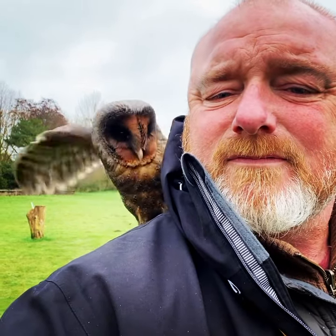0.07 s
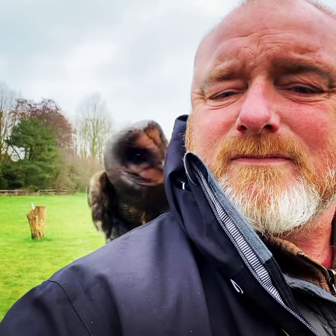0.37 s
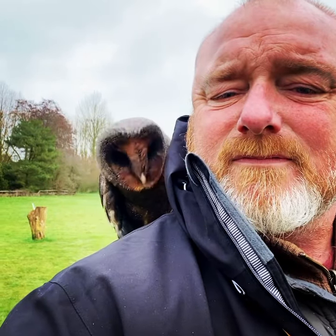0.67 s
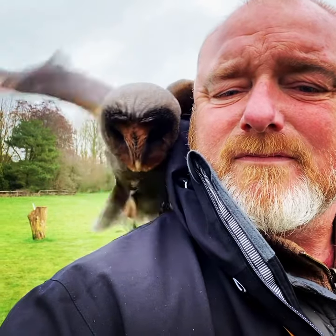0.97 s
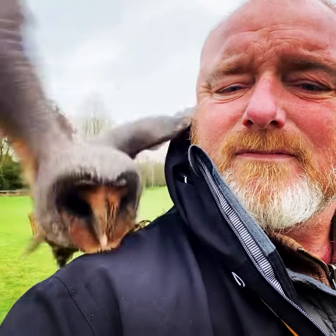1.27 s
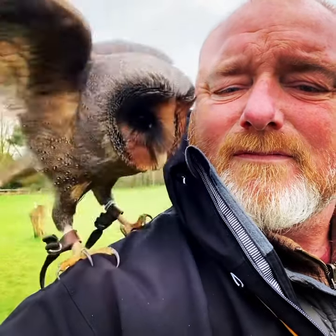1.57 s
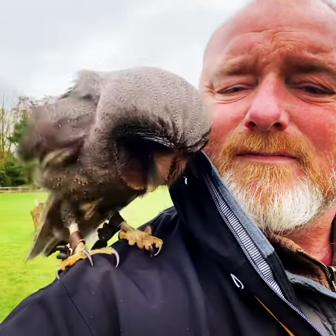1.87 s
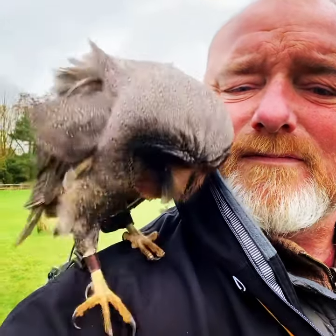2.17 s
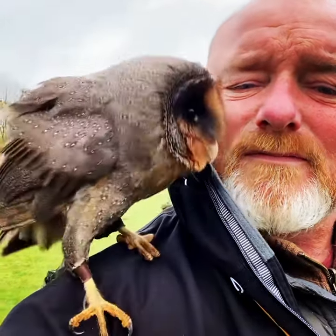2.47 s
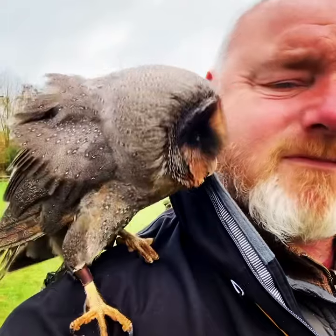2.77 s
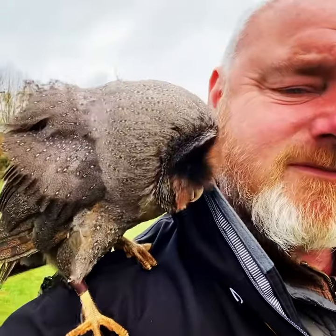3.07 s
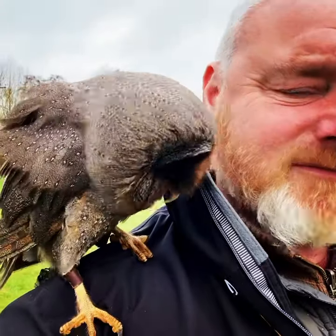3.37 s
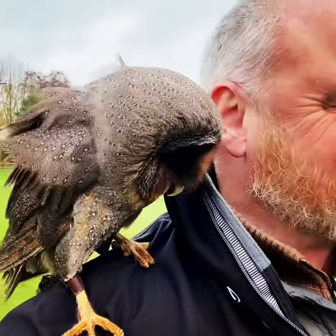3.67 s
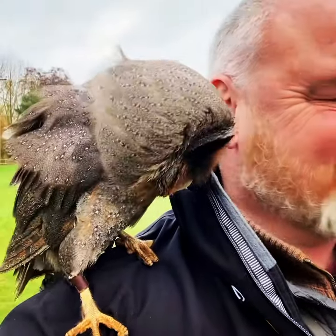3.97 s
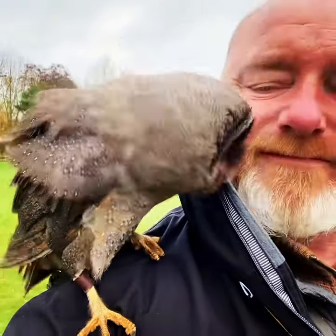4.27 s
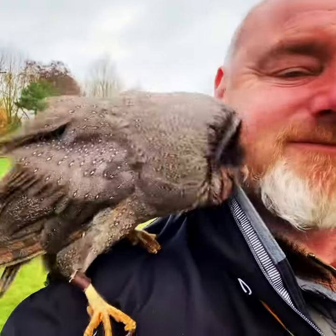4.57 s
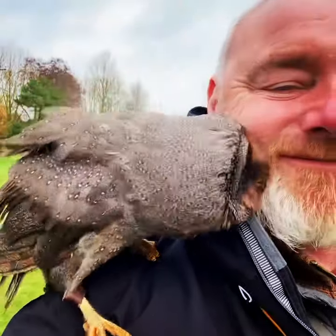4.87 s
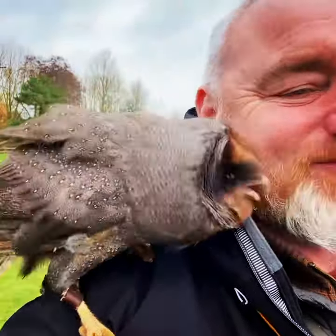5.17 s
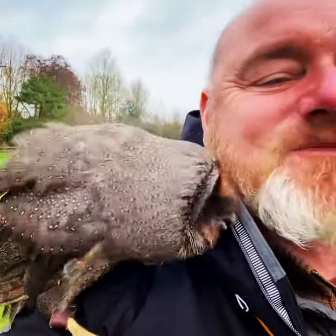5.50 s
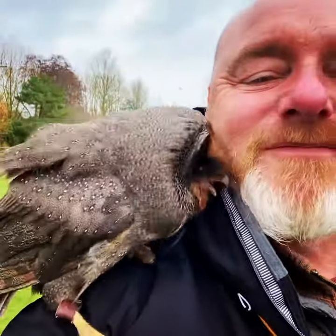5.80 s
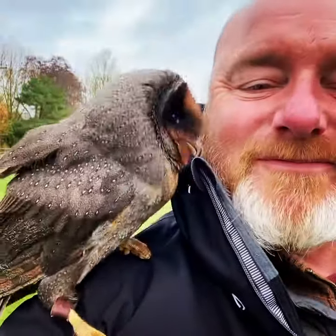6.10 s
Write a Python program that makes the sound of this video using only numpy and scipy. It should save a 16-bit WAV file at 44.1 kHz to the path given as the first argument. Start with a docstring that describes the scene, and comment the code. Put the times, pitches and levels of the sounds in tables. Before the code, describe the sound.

A soft wash of open-field air and a light breeze run throughout, with a distant engine droning low and fading out by about 2.5 seconds. From around 1 second, very close to the microphone, an owl scrambles onto a padded jacket: quick taps and scuffs of claws on cloth, rustling feathers and wing gusts, with a strong low thump on the microphone at 1.5 seconds. The movement settles just after 2 seconds. At 3 seconds the owl begins one harsh, hissing screech with a thin whistling edge; it grows louder and brighter, then stops abruptly at 3.8 seconds. A small scuff comes at 4.3 seconds and a sharp, dry beak snap at 4.5. A very faint, thin bird whistle sounds far away from about 5.6 to 6.1 seconds. Just after 6 seconds the owl shuffles briefly on the jacket with soft puffs of air.

```python
"""In a quiet field a far engine drones and fades under the outdoor wash. An owl scrambles onto a jacketed
shoulder close to a handheld camera: its feet scuff the cloth by friction, its wings push air at the
microphone and its feathers settle. It then gives one long screech, a turbulent jet filtered by the
resonances of throat and beak, and snaps its beak shut. A faint bird whistles far away, and last the owl
shuffles briefly on the jacket."""
import sys
import numpy as np
from scipy import signal
from scipy.fft import rfft, irfft, next_fast_len
from scipy.io import wavfile
from scipy.ndimage import uniform_filter1d, map_coordinates

SR = 44100
rng = np.random.default_rng(int(sys.argv[2]) if len(sys.argv) > 2 else 0)


def put_to_file(sound):
    """Save the sound as 16-bit audio at rate SR, in the file named by the first command-line argument."""
    columns = np.atleast_2d(sound).T  # one column per channel
    safe = np.clip(columns, -1, 1)
    whole_steps = np.round(safe * 32767)
    wavfile.write(sys.argv[1], SR, whole_steps.astype(np.int16))


N = 279594
T = np.arange(N) / SR
HZ = np.fft.rfftfreq(next_fast_len(N), 1 / SR)
CALL_START_S, CALL_PEAK_S, CALL_END_S = 3.022, 3.722, 3.791

# Spectrum of air striking the microphone. Each row: frequency in Hz, relative level in dB.
BUFFET = [(15, -27.5), (35, -13.5), (60, 1.5), (95, -7), (140, -4.5), (200, -4.5), (330, -2.5), (500, -7)]
# Phase of the close call at the two ports. Each row: frequency in Hz, lead of the left in radians.
CALL_LEAD = [(250, 0), (1500, .8), (2050, .15), (2350, 1.1), (2900, 1.4), (3500, 2.2), (4200, 1.65),
             (4800, 3.1), (5200, 2.9), (5900, -.6), (6300, .3), (6700, -.5), (9500, -1.1), (12500, -3.3)]


def from_db(db):
    """Converts decibels to an amplitude ratio."""
    return 10 ** (np.asarray(db) / 20)


def unit(x):
    """Normalises to rms 1."""
    return x / np.sqrt(np.mean(x ** 2) + 1e-20)


def over_hz(points, hz=HZ):
    """Interpolates a table on a log-frequency axis."""
    f, value = np.transpose(points)
    return np.interp(np.log(hz + 1), np.log(f + 1), value)


def over_time(rows):
    """Interpolates each column of a time table at every sample."""
    s, *columns = np.transpose(rows)
    return [np.interp(T, s, c) for c in columns]


def white():
    """Two independent white noises."""
    return rng.standard_normal((2, N))


def wander(hz):
    """Random modulation of rms 1: noise low-passed near hz."""
    size = next_fast_len(N)
    return unit(irfft(rfft(rng.standard_normal(size)) * np.exp(-.5 * (HZ / hz) ** 2), size)[:N])


def ramp(from_s, to_s):
    """Linear envelope from 0 to 1 between two times."""
    return np.clip((T - from_s) / (to_s - from_s), 0, 1)


def arch(start_s, length_s):
    """Half-sine envelope, zero outside its span."""
    u = (T - start_s) / length_s
    return np.maximum(np.sin(np.pi * u), 0) * (u > 0) * (u < 1)


def swells(rows):
    """Sum of Gaussian envelopes."""
    return sum(from_db(db) * np.exp(-.5 * ((T - s) / half_s) ** 2) for s, db, half_s in rows)


def add(mix, s, sound):
    """Superposes a stereo sound on the mix from time s."""
    part = mix[:, round(s * SR):][:, :sound.shape[1]]
    part += sound[:, :part.shape[1]]


def lean(x, left_db):
    """A level difference between the channels shifts a sound sideways."""
    return x * from_db([[left_db / 2], [-left_db / 2]])


def ports(pair, gain, diffuse=0, lead=None):
    """Two microphone ports hear a filtered sound in differing phase; diffuse sound is less coherent."""
    # Usual phase difference. Each row: frequency in Hz, lead of the left port in radians.
    usual_lead = [(20, 1.03), (150, -0.13), (450, 0.37), (1000, 0.83), (1600, 0.2), (2020, 1.34),
                  (2400, 0.5), (2800, 0.93), (3500, 2.5), (4200, 2.13), (4800, 3.5), (5000, 3.5),
                  (5300, 2.5), (5600, 2.5), (5900, 1.9), (6300, 1.1), (6800, 0.9), (8000, -1.3),
                  (10000, -0.9), (12500, -3.5)]
    # Likeness of the ports. Each row: frequency in Hz, coherence from 0 to 1.
    coherence = [(40, 0.99), (150, 0.71), (280, 0.84), (600, 1), (1400, 0.99), (2400, 1), (3100, 0.76),
                 (4000, 0.79), (4700, 0.92), (5100, 1), (5900, 0.33), (6800, 0.86), (8000, 0.53),
                 (8800, .8), (10000, 0.33), (12000, 0.76)]
    # The left port's narrow treble dip. Each row: frequency in Hz, left minus right in dB.
    port_dip = [(5300, 1), (5650, -2.5), (6600, 0.5)]
    size = next_fast_len(pair.shape[1])
    hz = np.fft.rfftfreq(size, 1 / SR)
    a, b = rfft(pair, size) * gain
    alike = np.clip(over_hz(coherence, hz) * (1 - diffuse), 0, 1)
    common, apart = a * np.sqrt((1 + alike) / 2), b * np.sqrt((1 - alike) / 2)
    phase = over_hz(usual_lead if lead is None else lead, hz)
    turn = np.exp(.5j * phase) * from_db(over_hz(port_dip, hz) / 2)
    return irfft(np.array([(common + apart) * turn, (common - apart) / turn]), size)[:, :pair.shape[1]]


def flicker(x, patch_db, patch_hz, patch_s):
    """Random gain in patches of time and frequency keeps the timbre shifting."""
    hz, s, spectra = signal.stft(x, SR, nperseg=512, noverlap=384)
    size = spectra.shape[1:]
    across, along = np.fft.fftfreq(size[0], hz[1])[:, None], np.fft.fftfreq(size[1], s[1])
    smooth = np.exp(-(across * patch_hz) ** 2 - (along * patch_s) ** 2)
    patches = unit(np.fft.ifft2(np.fft.fft2(rng.standard_normal(size)) * smooth).real)
    return signal.istft(spectra * from_db(patch_db * patches), SR, nperseg=512, noverlap=384)[1][:, :N]


def reedy_tone(hz, jitter_hz, jitter_rate_hz):
    """Random frequency modulation broadens a tone of constant amplitude."""
    return np.sqrt(2) * np.sin(2 * np.pi * np.cumsum(hz + jitter_hz * wander(jitter_rate_hz)) / SR)


def field(gain_db=2.0, waver_db=.3):
    """Far traffic and air over open ground add incoherently to a nearly steady wash."""
    # Spectrum of the wash. Each row: frequency in Hz, relative level in dB.
    spectrum = [(20, -14.5), (60, 7), (130, -1.5), (220, -3.5), (320, -11.5), (520, -13), (800, -0.5),
                (1150, -3.5), (1700, -4), (2200, -10.5), (3300, -15), (4400, -21.5), (5400, -27),
                (6600, -39.5), (12000, -47.5)]
    # Its slow swell. Each row: time in seconds, relative level in dB.
    swell = [(0, -60.5), (.7, -57), (2.9, -61), (4.2, -60.5), (5.1, -60), (5.9, -62.5)]
    level_db, = over_time(swell)
    wash = unit(ports(white(), from_db(over_hz(spectrum)), diffuse=0.18))
    return wash * from_db(level_db + gain_db + waver_db * wander(9.5))


def engine(roar_db=-3.0, waver_db=1.54, drift=0.0037, lead_rad=0.61):
    """Periodic firing gives a tone and lower orders in a low roar, all fading with distance."""
    # The engine's course. Each row: time in seconds, firing frequency in Hz, level in dB.
    course = [(0, 196.8, -51.5), (.45, 195.5, -52.5), (.68, 195.4, -54.5), (.78, 192, -64),
              (.95, 196, -56.5), (1.3, 199.5, -55.5), (2.15, 205.4, -61.5), (2.4, 206, -71.5),
              (3.4, 207.6, -80)]
    # Its tones. Each row: multiple of the firing frequency, relative level in dB.
    orders = [(1 / 2, -12), (3 / 4, -8.5), (0.99, 0)]
    # Its roar. Each row: frequency in Hz, relative level in dB.
    spectrum = [(30, -23), (70, -13), (150, -4), (220, 0), (330, -12), (550, -36), (850, -9.5), (1200, -27),
                (3000, -73.5)]
    hz, level_db = over_time(course)
    turns = np.cumsum(hz * (1 + drift * wander(10))) / SR
    lead = np.array([[lead_rad], [0]])
    tones = sum(from_db(db) * unit(np.sin(2 * np.pi * k * turns + lead) * from_db(waver_db * wander(8.5)))
                for k, db in orders)
    roar = unit(ports(white(), from_db(over_hz(spectrum)), diffuse=0.286))
    return from_db(level_db) * (tones + from_db(roar_db) * roar)


def breeze(calm_db=-67, top_hz=130, lump_db=2):
    """Turbulence in a light wind makes low, lumpy pressure noise on the microphone."""
    # Slow puffs. Each row: peak time in seconds, level in dB, half length in seconds.
    puffs = [(1.2, -58, 0.67), (3.55, -60, 0.38), (6.299, -62, 0.31)]
    wind = from_db(calm_db) + swells(puffs)
    colour = from_db(over_hz(BUFFET)) / np.sqrt(1 + (HZ / top_hz) ** 6)
    return unit(ports(white(), colour, diffuse=0.37)) * wind * from_db(lump_db * wander(9.9))


def rustle(gain_db=7, grain_db=3, stir_db=-83, slide_bend=0.73):
    """Friction of feather barbs on each other and on cloth makes grainy noise that grows with speed."""
    # Wing or body slides. Each row: start in seconds, length in seconds, relative level in dB.
    slides = [(-.13, 0.26, -69), (0.798, 0.71, -68.5), (1.62, 0.61, -63.5), (4.193, 0.22, -83.5),
              (4.522, 0.15, -72.5), (6.172, 0.12, -69)]
    # Feather spectrum. Each row: frequency in Hz, relative level in dB.
    spectrum = [(200, 21), (500, 17), (1000, 3.5), (2000, 9), (3200, -1), (4600, 11), (6000, -1.5),
                (8000, -6.5), (10500, -6.5), (12500, -14.5)]
    sliding = sum(from_db(db) * arch(s, length_s) ** slide_bend for s, length_s, db in slides)
    speed = from_db(stir_db) + sliding
    grains = white() * unit(from_db(grain_db * wander(1500)))
    return unit(ports(grains, from_db(over_hz(spectrum)))) * speed * from_db(gain_db)


def ticks(decay_s=0.00099):
    """Brief contact gives a broad spectrum: claws and leg straps flick brightly off the jacket."""
    # Contacts. Each row: start in seconds, relative level in dB.
    contacts = [(0.917, -42), (1.107, -30.5), (1.385, -40), (1.5787, -42), (4.2955, -49), (6.2675, -47)]
    # Their spectrum. Each row: frequency in Hz, gain in dB.
    spectrum = [(500, -18), (2500, -5), (5000, 6), (7000, -0.5), (10000, -3), (12500, -8)]
    flicks = np.zeros((2, N))
    fade = np.exp(-np.arange(SR // 100) / (decay_s * SR))
    for s, db in contacts:
        add(flicks, s, from_db(db) * rng.standard_normal((2, len(fade))) * fade / np.linalg.norm(fade))
    return ports(flicks, from_db(over_hz(spectrum)), diffuse=0.82)


def scuffs(rise_s=0.0002, grain_db=3, lag_s=0.002124, lag_hz=1200, gain_db=2, claw_db=-14, knock_db=19):
    """Stick-slip friction: feet and wing tips knock and skid on padded cloth; claws add a crisp top."""
    # Strokes on the jacket. Each row: start in seconds, relative level in dB, decay in seconds,
    # crispness in dB, pitch factor of the cloth.
    strokes = [(0.999, -40.5, 0.0084, -4, 1.25), (1.035, -45, 0.0061, -13, 0.98),
               (1.052, -37.5, 0.0022, -2, 1.2), (1.061, -44, 0.0098, -9, 0.98),
               (1.106, -36, 0.0022, 0, 0.85), (1.124, -35.5, 0.0032, -4, 0.79),
               (1.161, -45, 0.028, 2, 0.72), (1.181, -33.5, 0.011, -2.5, 0.96),
               (1.193, -34.5, 0.008, -4, 1.2), (1.203, -38, 0.0055, -6, 0.92),
               (1.347, -32.5, 0.0039, 0.5, 0.81), (1.358, -38, 0.0022, -13, 0.88),
               (1.577, -28, 0.0016, 0, 0.96), (1.649, -44.5, 0.005, -13, 0.71),
               (1.666, -42, 0.014, -4, 0.85), (2.002, -35, 0.0019, -6, 1.02), (2.078, -52, 0.016, -8, 1.04),
               (2.092, -44, 0.013, 4, 1.52), (4.294, -46.5, 0.0016, -2, 1), (4.526, -47.5, 0.0011, 2, 0.62),
               (5.374, -54.5, 0.01, 5.5, 0.7), (6.199, -55.5, 0.019, 8.5, 1), (6.222, -43, 0.006, -8, 0.61),
               (6.267, -50.5, 0.002, -8, 1.4)]
    # Response of the padded cloth. Each row: frequency in Hz, relative level in dB.
    cloth_spectrum = [(100, -6.5), (300, -4.5), (550, -0.5), (900, 2.5), (1300, -2), (1850, -9),
                      (2500, -34), (4500, -29), (12500, -60)]
    # A claw or feather shaft catching. Each row: frequency in Hz, relative level in dB.
    claw_spectrum = [(100, -60), (1500, -34), (2700, -16), (4200, -9.5), (6300, -18), (9000, -33.5),
                     (12500, -30.5)]
    out, t = np.zeros((2, N)), np.arange(-SR // 50, SR // 8) / SR
    hz, age = np.fft.rfftfreq(next_fast_len(len(t)), 1 / SR), np.maximum(t, 0)
    # Dispersion: the padding answers later at low frequencies, so each tap droops in pitch.
    droop = np.exp(-2j * np.pi * lag_s * lag_hz * np.tanh(hz / lag_hz))
    for s, db, decay_s, crisp_db, pitch in strokes:
        envelope = (1 - np.exp(-age / rise_s)) * np.exp(-age / decay_s)
        grain = unit(uniform_filter1d(rng.standard_normal(len(t)), size=16))
        slips = rng.standard_normal((2, len(t))) * from_db(grain_db * grain) * envelope
        slips[0, np.argmax(envelope)] += from_db(knock_db)
        cloth = unit(ports(slips, from_db(over_hz(cloth_spectrum, hz / pitch)) * droop))
        claw = unit(ports(slips, from_db(over_hz(claw_spectrum, hz))))
        level = from_db(db + gain_db) * np.sqrt(np.mean(envelope ** 2))
        add(out, s + t[0], level * (cloth + from_db(crisp_db + claw_db) * claw))
    return out


def wing_gusts(rise_s=0.008):
    """Each wing stroke sheds a swirl of low pressure noise on the microphone; faster air reaches higher."""
    # Wing strokes. Each row: start in seconds, level in dB, decay in seconds, cutoff in Hz.
    strokes = [(1.169, -43.5, 0.056, 140), (1.269, -48, 0.5, 89), (1.438, -30.5, 0.01, 255),
               (1.465, -30, 0.051, 92.3), (1.505, -26.5, 0.07, 152), (1.642, -35, 0.011, 170),
               (1.658, -27, 0.021, 87), (1.702, -34.5, 0.054, 79), (1.835, -38, 0.011, 78.6),
               (5.875, -44.5, 0.0087, 112), (6.128, -43, 0.049, 76), (6.222, -40, 0.023, 81.4),
               (6.324, -44, 0.034, 115)]
    out, t = np.zeros((2, N)), np.arange(-SR // 10, SR // 2) / SR
    hz, age = np.fft.rfftfreq(len(t), 1 / SR), np.maximum(t, 0)
    for s, db, decay_s, top_hz in strokes:
        colour = from_db(over_hz(BUFFET, hz)) / np.sqrt(1 + (hz / top_hz) ** 8)
        envelope = np.minimum(age / rise_s, np.exp((rise_s - age) / decay_s))
        swirl = unit(ports(rng.standard_normal((2, len(t))) * envelope, colour))
        add(out, s + t[0], from_db(db) * np.sqrt(np.mean(envelope ** 2)) * swirl)
    return out


def thump(peak_s=1.517, rise_share=0.88):
    """The closest wingbeat excites the camera's low resonances; each builds faster than it dies."""
    # Modes. Each row: frequency in Hz, level in dB, half length in seconds, left lead in radians.
    modes = [(61.3, -15, 0.014, 0.23), (137.5, -18, 0.011, 0.96), (330, -34.5, 0.014, 2.33)]
    out, age = np.zeros((2, N)), T - peak_s
    stretch = np.where(age < 0, rise_share, 1)
    for hz, db, half_s, lead in modes:
        phase = 2 * np.pi * hz * age + np.array([[lead / 2], [-lead / 2]])
        out += from_db(db) * np.cos(phase) * np.exp(-.5 * (age / (half_s * stretch)) ** 2)
    return out


def far_rush(lump_db=2.7):
    """Amplitude-modulated noise swells and sinks softly, perhaps air in the bare trees."""
    # Swells. Each row: peak time in seconds, level in dB, half length in seconds.
    rushes = [(2.598, -69.5, 1), (5.22, -68, 0.23), (5.805, -71.5, 0.34)]
    # Their spectrum. Each row: frequency in Hz, relative level in dB.
    spectrum = [(500, -30), (1300, -6), (2300, 0.5), (3400, -1), (4500, -8), (6500, -34)]
    rush = flicker(ports(white(), from_db(over_hz(spectrum))), patch_db=3, patch_hz=350, patch_s=0.14)
    return unit(rush) * swells(rushes) * from_db(lump_db * wander(10))


def squeak(start_s=3.0175, length_s=.014, from_hz=720, to_hz=1500, gain_db=-37.5):
    """The call catches with a tiny chirp, a linear upward frequency sweep."""
    u = np.clip((T - start_s) / length_s, 0, 1)
    tone = np.sin(2 * np.pi * np.cumsum(from_hz + (to_hz - from_hz) * u) / SR) * np.sin(np.pi * u) ** 2
    return from_db(gain_db) * ports(np.array([tone, 0 * tone]), 0.87)


def call_gesture(peak_db=-33, crescendo_db=9.5, release_db=15, jerk_at_s=3.305, jerk_s=.02, jerk_db=1.5):
    """One breath drives the call: effort in dB and beak opening both grow, then drop at its end."""
    # The beak opens in two jerks. Each row: time in seconds, opening from 0 (shut) to 1 (wide).
    openings = [(3.03, 0), (3.28, 0.18), (3.34, 0.44), (3.47, 0.59), (3.57, .88), (3.73, .98), (3.79, 0.7)]
    push, release = ramp(CALL_START_S, CALL_PEAK_S), ramp(CALL_PEAK_S, CALL_END_S)
    effort_db = peak_db - crescendo_db * (1 - push) ** 1.65 - release_db * release ** 2.85
    held_back = .5 - .5 * np.tanh((T - jerk_at_s) / jerk_s)  # the first jerk lets out more air
    gape, = over_time(openings)
    return effort_db - jerk_db * held_back, np.clip(gape, 0, 1)


def sputter(hiss, from_hz=2800, spits_per_s=40, spit_s=.0045, spit_db=5.5, flutter_db=.8, flutter_hz=25):
    """Random spits and a slower flutter in the jet modulate the amplitude of the treble."""
    impulses = (rng.random(N) < spits_per_s / SR) * rng.uniform(.5, 1, N)
    spits = np.minimum(signal.oaconvolve(impulses, np.hanning(round(spit_s * SR)), "same"), 1)
    gain = unit(from_db(spit_db * spits + flutter_db * wander(flutter_hz)))
    treble = signal.sosfiltfilt(signal.butter(2, from_hz, "high", fs=SR, output="sos"), hiss)
    return hiss + treble * (gain - 1)


def screech(rasp_db=0.5, rasp_hz=170, bright_at_s=3.055, dull_hz=2400, dull_db=-5.5, edge_s=0.0061):
    """Source and filter: air forced through the syrinx hisses in resonances weighted by the gape."""
    # Throat and beak resonances. Each row: frequency in Hz, width in Hz, then relative levels in dB
    # with the beak nearly shut, half open and wide open.
    formants = [(566, 278, -5.5, -8, -9), (1060, 318, 3, .5, 0.5), (1810, 150, -4, -9, -8.5),
                (2190, 450, -9, -1, -4), (2530, 1030, -6, -22.5, -15), (3340, 610, -6.5, -14.5, -28),
                (3830, 305, -12, -1, -5.5), (4190, 370, -0.5, -8, 3), (4510, 290, -1, 0, 5.5),
                (5120, 290, -2.5, 4, 4.5), (5500, 670, -14, -1.5, -2), (7110, 850, -6.5, -3.5, 1),
                (8710, 770, -12.5, -10.5, -11.5), (10280, 4500, -21, -22, -17.5)]
    effort_db, gape = call_gesture()
    gape = np.clip(gape + 0.068 * wander(20.0), 0, 1)  # the beak trembles
    air = sputter(white()) * from_db(rasp_db * wander(rasp_hz))
    shapes = [np.sqrt(sum(from_db(levels[k]) ** 2 / (1 + 1.66 * ((HZ - hz) / width) ** 2) ** 3
                          for hz, width, *levels in formants)) for k in range(3)]
    bright = sum(np.maximum(1 - abs(2 * gape - k), 0) * unit(ports(air, shape, lead=CALL_LEAD))
                 for k, shape in enumerate(shapes))
    # The first weak flow is dull, until the jet turns fully turbulent.
    dull = unit(ports(air, shapes[0] / np.sqrt(1 + (HZ / dull_hz) ** 4), lead=CALL_LEAD))
    turbulence = .5 + .5 * np.tanh((T - bright_at_s) / 0.013)
    hiss = turbulence * bright + (1 - turbulence) * from_db(dull_db) * dull
    gate = ramp(CALL_START_S, CALL_START_S + edge_s) * ramp(CALL_END_S + edge_s, CALL_END_S - edge_s)
    return (hiss + whistles(gape)) * from_db(effort_db) * gate


def whistles(gape, jitter_hz=95, jitter_rate_hz=110, sway=.012, onset_span=.35):
    """The sharpest resonances whistle as the beak opens, swaying together as the throat trembles."""
    # Whistles. Each row: frequency in Hz, full level against the hiss in dB, opening at onset.
    cores = [(2150, -13, .1), (4230, -14, .55), (5490, -19, .2)]
    stretch = 1 + sway * wander(11.78)
    tone = np.zeros(N)
    for hz, db, opening in cores:
        onset = np.clip((gape - opening) / onset_span, 0, 1)
        tone += from_db(db) * onset * reedy_tone(hz * stretch, jitter_hz, jitter_rate_hz)
    return ports(np.array([tone, 0 * tone]), 1, lead=CALL_LEAD)


def face_echo(x, delay_s=.0022, echo_db=-15, sway=0.032):
    """Reflection from the face beside the beak comb-filters the call; the path sways as the bird moves."""
    emitted_s = T - delay_s * (1 + sway * wander(6.1))
    return x + from_db(echo_db) * np.array([map_coordinates(side, [emitted_s * SR], order=3) for side in x])


def beak_snaps():
    """Impact of the two halves of the beak: an impulse, filtered into a hard, dry click."""
    # Impacts. Each row: time in seconds, relative level in dB.
    impacts = [(4.5252, -24), (4.5365, -48)]
    # Response of the beak. Each row: frequency in Hz, relative level in dB.
    spectrum = [(200, -24), (1500, -19), (3200, -13), (4300, -1), (5400, 7), (7000, -18), (9000, -27),
                (12500, -20)]
    clicks = np.zeros((2, N))
    for s, db in impacts:
        clicks[0, round(s * SR)] = from_db(db)
    return ports(clicks, unit(from_db(over_hz(spectrum))))


def far_bird(start_s=5.59, length_s=0.53, start_hz=3440, sag_hz_per_s=70, gain_db=-63.5):
    """One thin whistle swells and sinks in pitch; fast frequency modulation gives it a raspy edge."""
    hz = start_hz - sag_hz_per_s * (T - start_s)
    core = from_db(-3) * reedy_tone(hz, jitter_hz=32, jitter_rate_hz=20)
    rasp = from_db(-1) * reedy_tone(hz, jitter_hz=190, jitter_rate_hz=401.5)
    envelope = from_db(gain_db) * np.sqrt(arch(start_s, length_s))
    return ports(np.array([core + rasp, np.zeros(N)]), 1) * envelope


def open_air(x, near_db=-22.5, near_t60=0.178, far_db=-19, far_t60=1.6, far_hz=1250, far_width_hz=600):
    """Scattering adds a faint, short tail from the ground and a longer, dull one from the trees."""
    t = np.arange(SR) / SR
    decays = from_db(-60 * t / np.array([near_t60, far_t60])[:, None, None])
    near, far = rng.standard_normal((2, 2, len(t))) * decays
    band = np.exp(-.5 * ((np.fft.rfftfreq(len(t), 1 / SR) - far_hz) / far_width_hz) ** 2)
    ground = from_db(near_db) * near / np.linalg.norm(near[0])
    trees = from_db(far_db) * ports(far / np.linalg.norm(far[0]), band)
    return x + signal.fftconvolve(x, ground + trees, axes=1)[:, :N]


def scene():
    """Superposition of the owl close by, air on the microphone and the field behind."""
    call = flicker(screech(), patch_db=1.68, patch_hz=450, patch_s=0.097) + squeak()
    voice = lean(face_echo(call), left_db=-0.9)
    movement = lean(scuffs() + ticks() + beak_snaps() + rustle(), left_db=-0.5)
    air = lean(wing_gusts() + thump() + breeze(), left_db=-0.5)
    owl = open_air(voice + movement)
    background = lean(field() + far_rush(), left_db=1.0)
    return owl + air + background + engine() + far_bird()


def record(dry):
    """A low-pass filter removes the highest treble, above 12.8 kHz."""
    edge_hz = 12800
    return signal.oaconvolve(dry, signal.firwin(401, edge_hz, window=("kaiser", 8), fs=SR)[None], "same")


dry = scene()
out = record(dry)
put_to_file(out)
```